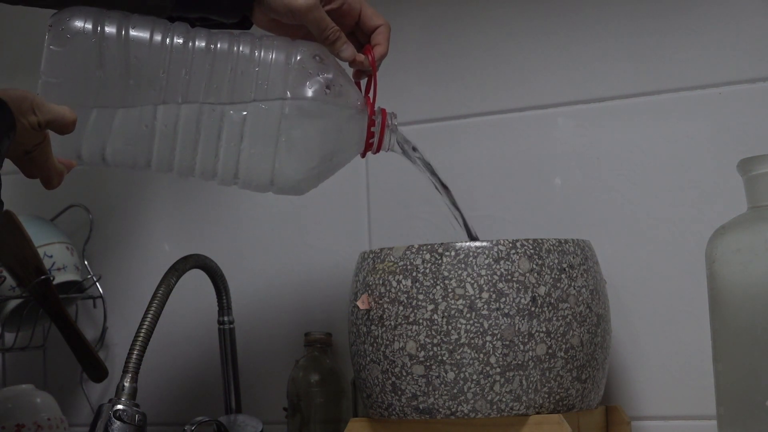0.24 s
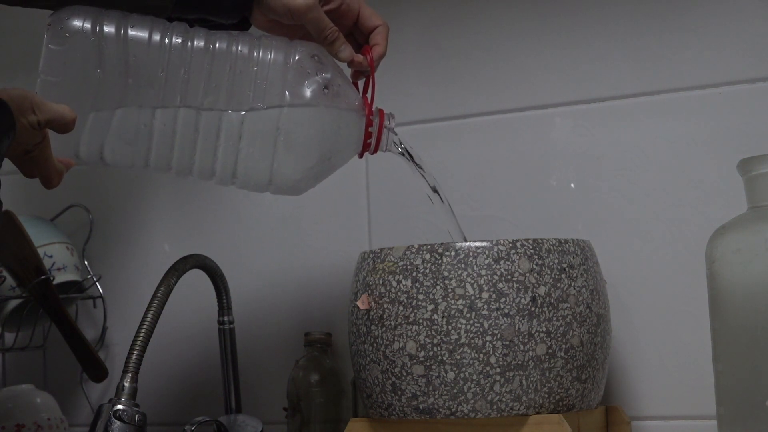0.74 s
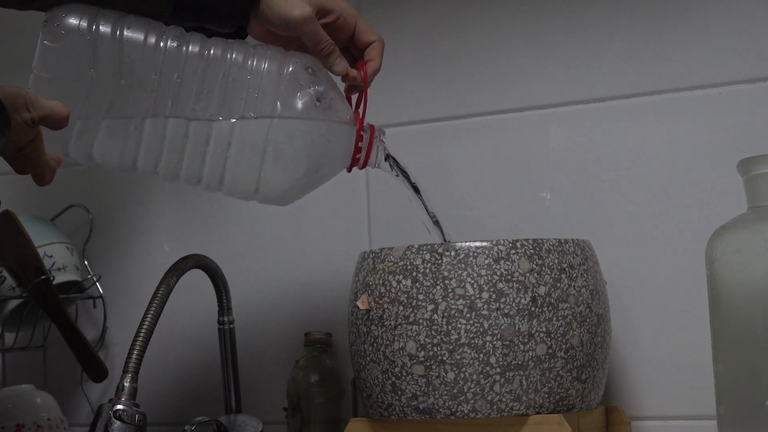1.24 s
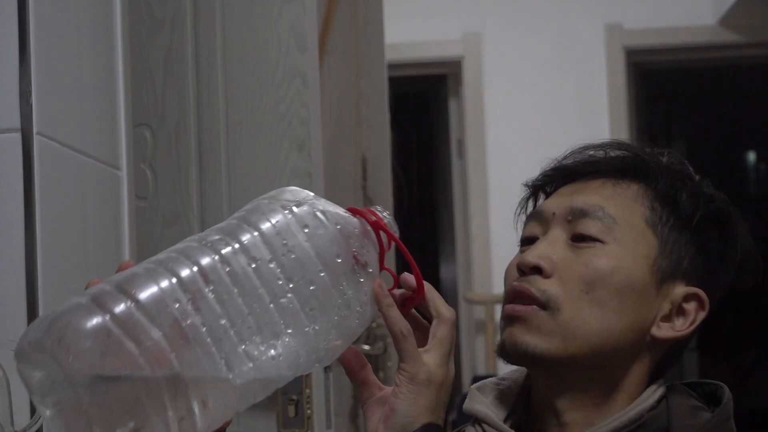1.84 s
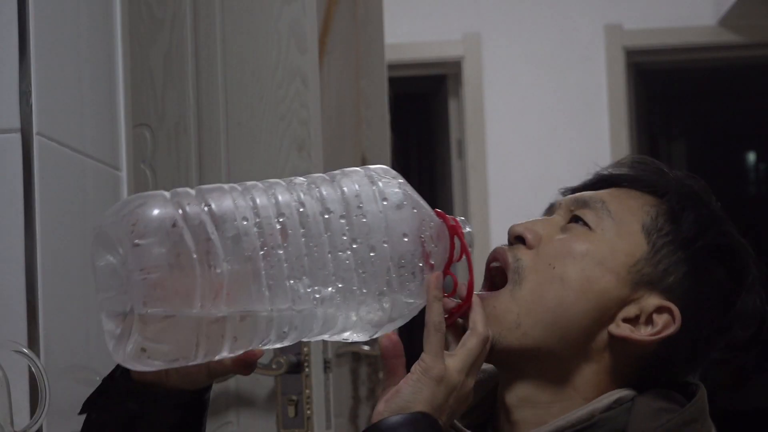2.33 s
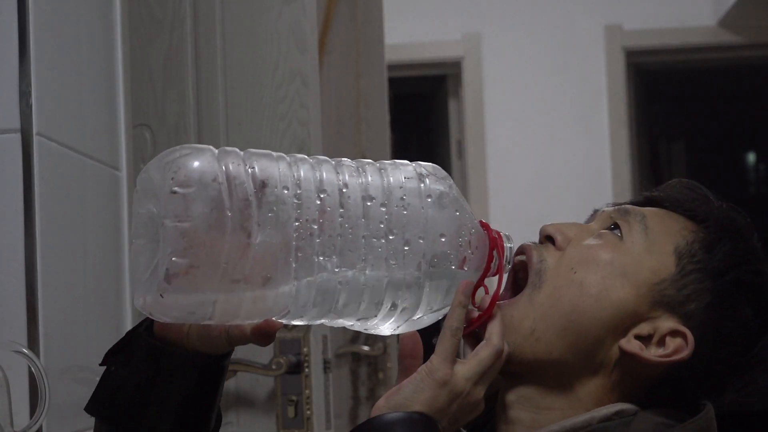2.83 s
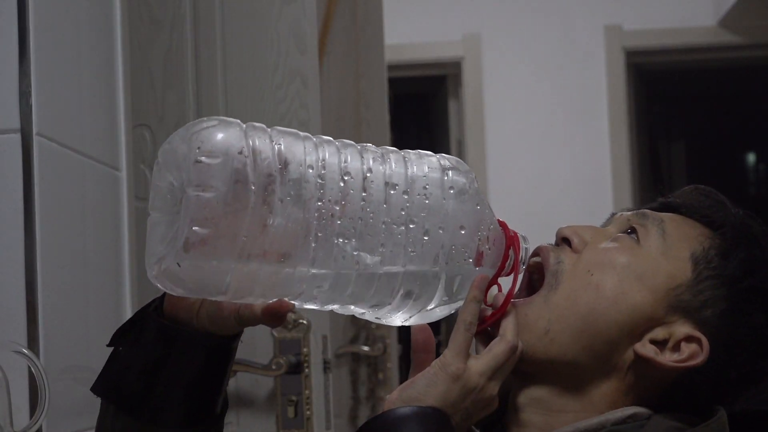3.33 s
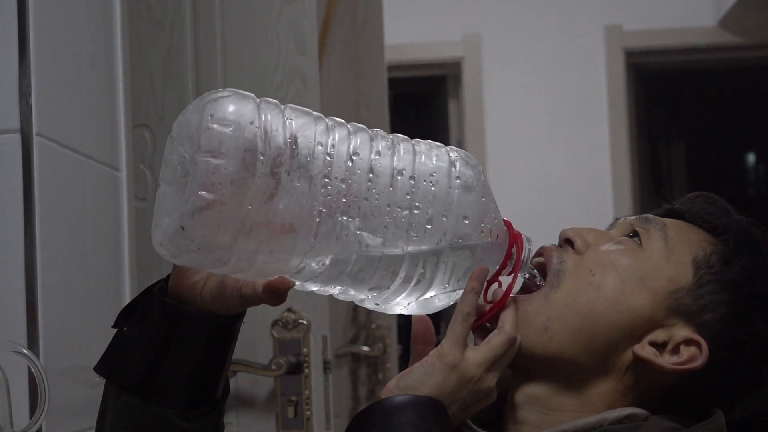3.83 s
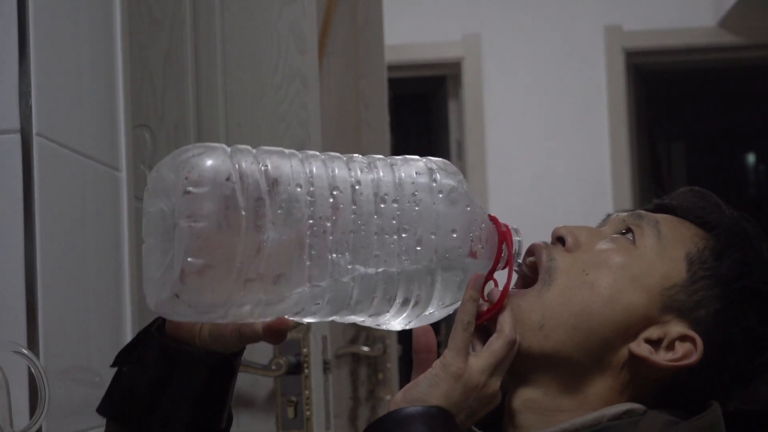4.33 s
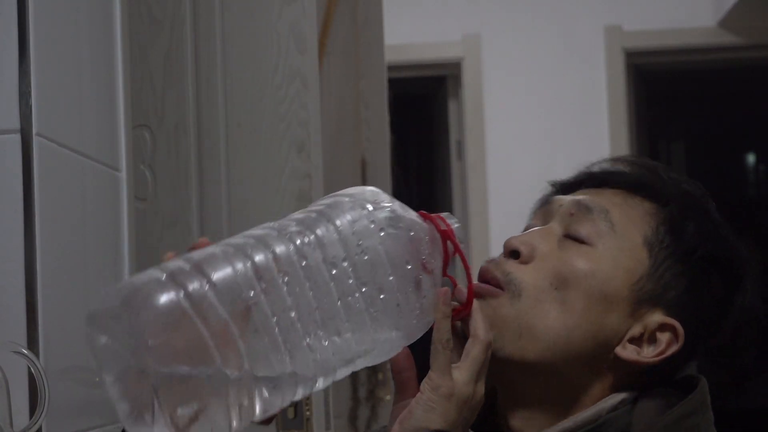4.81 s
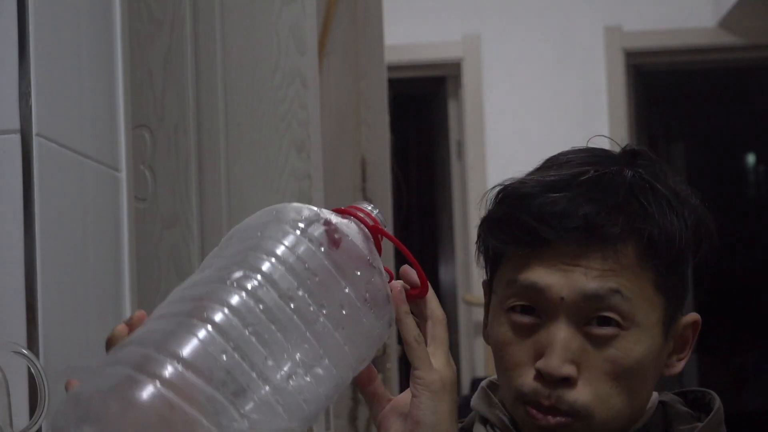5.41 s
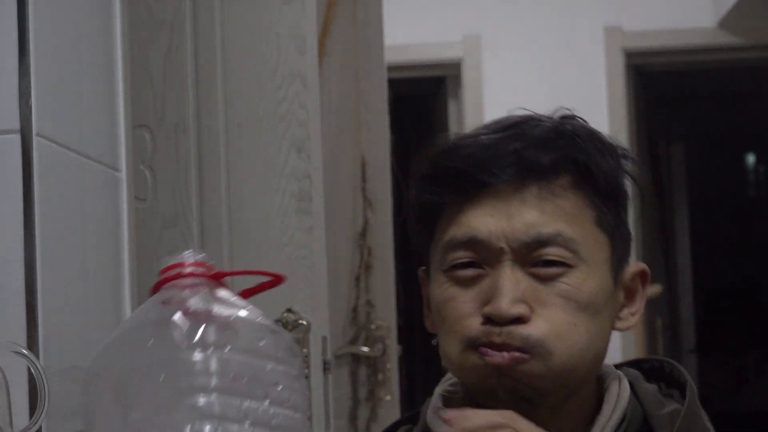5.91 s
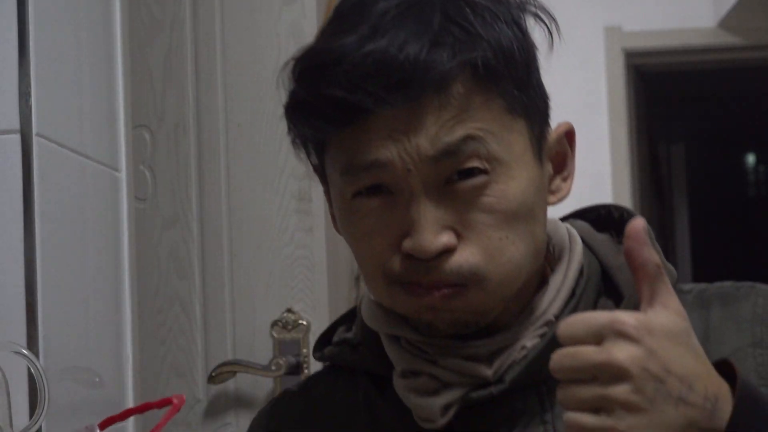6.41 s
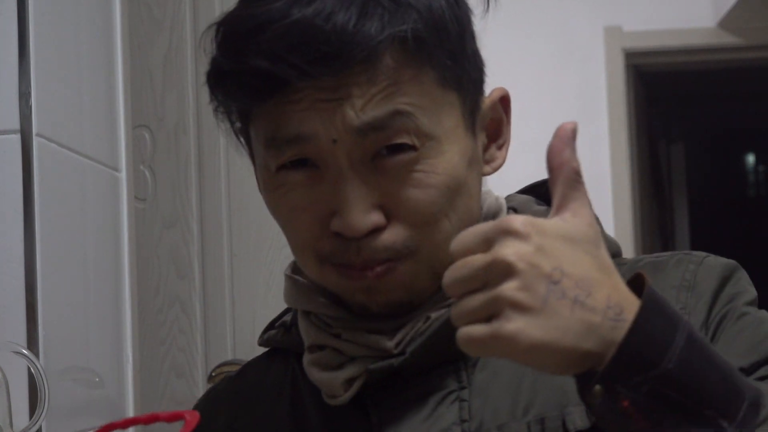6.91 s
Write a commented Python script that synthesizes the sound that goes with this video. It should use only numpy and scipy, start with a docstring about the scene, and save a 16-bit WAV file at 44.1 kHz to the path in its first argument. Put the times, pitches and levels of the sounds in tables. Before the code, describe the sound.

Water trickles from a big plastic jug into a stone crock with a deep gulp, a hollow knock, then plops, a sharp plastic crack and rustling cloth.

```python
"""Water runs from a big thin plastic jug into a stone crock in a tiled kitchen; the jug gulps, then knocks hollowly.
After an abrupt change of scene the jug is tipped up and the water plops inside it; it is lowered,
its dented wall pops back with a loud crack, and a jacket rustles.
Bubbles, gulps and the jug's ringing are fading sine tones; spray, splashes, ticks, thuds, cracks and cloth
are shaped noise. Echoes off the tiles and a faint microphone hiss over a low rumble go with them."""
import sys
import numpy as np
from scipy import signal
from scipy.fft import rfft, irfft
from scipy.io import wavfile
from scipy.ndimage import uniform_filter1d

SR = 44100
rng = np.random.default_rng(int(sys.argv[2]) if len(sys.argv) > 2 else 0)


def generate_wav(sig):
    """Save sig (samples, or channels by samples) to the path in sys.argv[1] as 16-bit PCM at SR."""
    pcm = np.round(np.clip(np.atleast_2d(sig).T, -1, 1) * 32767).astype(np.int16)
    wavfile.write(sys.argv[1], SR, pcm)


N = 315315
TIME = np.arange(N) / SR   # seconds
SCENE_CHANGE_S, KNOCK_S = 1.863, 1.677


def from_db(db):
    """Turn decibels into a factor to multiply a sound by."""
    return 10 ** (np.asarray(db) / 20)


def rms_one(x):
    """Scale a sound to an average strength (rms) of 1."""
    return x / np.sqrt(np.mean(x ** 2) + 1e-20)


def at_hz(points, hz):
    """Read a table between its rows, with pitch spaced evenly by octaves."""
    table_hz, values = np.array(points).T
    return np.interp(np.log(np.maximum(hz, 1)), np.log(table_hz), values)


def filtered(x, curve):
    """Strengthen or weaken each pitch of a sound by the decibels in a table."""
    hz = np.fft.rfftfreq(len(x), 1 / SR)
    return irfft(rfft(x) * from_db(at_hz(curve, hz)), len(x))


def coloured(x, spectrum):
    """Give a sound its balance of low and high pitches, at rms 1."""
    return rms_one(filtered(x, spectrum))


def add(out, s, sound):
    """Mix a sound in at time s, in seconds."""
    start = max(int(s * SR), 0)
    out[..., start:start + sound.shape[-1]] += sound[..., :max(N - start, 0)]


def stereo(mid, side, width):
    """Left and right share one sound (mid) and differ by another (side), set by the width table."""
    side = filtered(side, width)
    return np.array([mid + side, mid - side])


def kitchen_echoes(spectrum):
    """Dense reflections off the tiles are noise that fades at its own pace in each band of pitch."""
    # How fast the echoes fade. Each row: pitch in Hz, time to fall by 60 dB in seconds.
    room_t60 = [(100, 0.65), (400, 0.36), (1200, 0.44), (4000, 0.41), (8000, 0.35), (15000, 0.27)]
    # Stereo width set for the echoes. Each row: pitch in Hz, side level minus mid level in dB.
    echo_width = [(60, -31.5), (250, -20.5), (500, -15), (2500, -9.5), (5600, -35.5), (7300, -3),
                  (10500, -4.5), (13000, -22)]
    t, tail = TIME[:SR * 4 // 5], 0
    hz = np.fft.rfftfreq(len(t), 1 / SR)
    noise = rfft([coloured(white, spectrum) for white in rng.standard_normal((2, len(t)))])
    edges = [0, 150, 300, 600, 1200, 2400, 4800, 6500, 8500, 11000, 13500, 22051]   # Hz
    for low, high in zip(edges, edges[1:]):
        band = irfft(noise * ((hz >= low) & (hz < high)), len(t))
        tail = tail + band * from_db(-60 * t / at_hz(room_t60, (low + high) / 2))
    return stereo(*tail, echo_width)


def in_room(x, echoes, direct_db, wet_db):
    """The ear gets the direct sound plus its reflections."""
    reflections = signal.fftconvolve(x[None], echoes)[:, :N]
    return from_db(direct_db) * x + from_db(wet_db) * reflections


def burst(spectrum, decay_s):
    """A spray of noise that dies away; the longer it lasts, the softer it starts."""
    t = TIME[:SR // 2]
    noise = coloured(rng.standard_normal(len(t)), spectrum)
    return noise * np.exp(-t / decay_s) * (1 - np.exp(-t / (0.18 * decay_s)))


def hump(hz, octaves):
    """A balance of pitches with one broad peak."""
    edge = 2 ** (octaves / 2)
    return [(hz / edge / 8, -45), (hz / edge, -3), (hz, 0), (hz * edge, -4), (hz * edge * 8, -60)]


def bubble(hz, t60, rise, swell):
    """A trapped air pocket swells and rings, rising in pitch as it nears the surface."""
    # rise: part of the pitch gained in t60 seconds; swell: part of t60
    t = TIME[:int(t60 * SR) + 2]
    envelope = (1 - np.exp(-t / (swell * t60))) * from_db(-60 * t / t60)
    return np.sin(2 * np.pi * hz * t * (1 + rise * t / t60 / 2)) * envelope


def background():
    """A faint steady microphone hiss lies over a low rumble that slowly changes level."""
    # Balance of the hiss, then of the rumble. Each row: pitch in Hz, relative level in dB.
    hiss_spectrum, rumble_spectrum = [(100, -39.5), (170, -8.5), (218, -4), (306, -12), (399, -10),
                                      (520, -15), (561, -10.5), (973, -11), (1340, -14), (15800, -24)], [(11, -43), (18, -7.5), (43, -0.5), (102, 1.5),
                                                    (127, -5), (146, -22), (167, -28), (183, -32),
                                                    (190, -45), (250, -64.5), (420, -120)]
    # Width of the hiss, then of the rumble. Each row: pitch in Hz, side level minus mid level in dB.
    hiss_width, rumble_width = [(150, -10.5), (350, 5), (1400, 6), (4500, -1), (10000, -2.5), (13500, -17)], [(60, -24.5), (200, -18.5)]
    # Loudness of the rumble. Each row: time in seconds, level in dB.
    rumble_levels = [(0, -61), (1.8, -63), (2.3, -60.5), (2.8, -56.5), (4.9, -57), (5.6, -61.5), (6.3, -63),
                     (7.15, -67.5)]
    hiss_db = -62
    hiss = stereo(*[coloured(white, hiss_spectrum) for white in rng.standard_normal((2, N))], hiss_width)
    rumble = stereo(*[coloured(white, rumble_spectrum) for white in rng.standard_normal((2, N))], rumble_width)
    rumble_db = np.interp(TIME, *np.transpose(rumble_levels))
    return from_db(hiss_db) * hiss + from_db(rumble_db) * rumble


def flow():
    """The stream is a thinning trickle; each surge rises quickly, holds and ebbs as the jug rocks."""
    # Surges of water. Each row: start in seconds, level in dB, time until it ebbs in seconds.
    surges = [(0.0, -55.5, 0.083), (0.076, -51.5, 0.08), (0.176, -44, 0.07), (0.276, -46, 0.037),
              (0.37, -31, 0.019), (0.472, -43.5, 0.085), (0.622, -57.5, 0.083), (1.085, -56, 0.09),
              (1.277, -50.5, 0.044), (1.577, -53.5, 0.078)]
    trickle_db, thinning_db_per_s = -54.5, 2
    attack_s, release_s = 0.012, 0.022
    out = from_db(trickle_db - thinning_db_per_s * TIME)
    for s, db, hold_s in surges:
        attack = np.clip((TIME - s) / attack_s, 0, 1)
        release = np.exp(-np.maximum(TIME - s - hold_s, 0) / release_s)
        out = np.hypot(out, from_db(db) * attack * release)
    return out


def stream(per_s, cycles, spread_db, bubbles_db, drops_per_s, drop_spread_db, spray_db):
    """The stream drags in many small bubbles and throws up a fine crackling spray."""
    # Balance of the spray. Each row: pitch in Hz, relative level in dB.
    spray_spectrum = [(1760, -22.5), (3000, -4), (5570, -4.5), (6990, -15.5), (8820, -12), (11300, -18.5),
                      (15500, -16)]
    # Bubbles of the full stream, then of the thin one. Each row: pitch in Hz,
    # relative level in dB before the extra strength for high pitches below.
    full_stream, thin_stream = [(410, -41), (700, -11), (1030, -4.5), (1850, -10), (2180, -2),
                                (2940, -10.5), (3400, -7), (5550, -16), (7000, -14), (9100, -47),
                                (15400, -120)], [(410, -50), (700, -20), (771, -27.5), (1020, -5),
                                              (1590, -4.5), (2060, -8), (3370, -3), (7000, -31),
                                              (9100, -46), (15400, -120)]
    full_stream_end_s = 0.71
    spray_fade_db_per_s = 3.5   # a gentler stream throws up less spray

    sizes = from_db(drop_spread_db * np.minimum(rng.exponential(1, N), 4)) * rng.choice([-1, 1], N)
    drops = sizes * (rng.random(N) < drops_per_s / SR)
    spray = from_db(spray_db - spray_fade_db_per_s * TIME) * coloured(drops, spray_spectrum)

    froth, length = np.zeros(N), int(SCENE_CHANGE_S * SR)
    births = rng.random((3000, 3))
    for when, size, strength in births[:int(per_s * SCENE_CHANGE_S)]:
        s = when * SCENE_CHANGE_S
        hz = 800 * 8 ** size
        spectrum = full_stream if s < full_stream_end_s else thin_stream
        # small bubbles die sooner and cover a wider band
        gain = from_db(at_hz(spectrum, hz) + spread_db * strength ** 2) * hz
        add(froth, s, gain * bubble(hz, cycles / hz, rise=0.22, swell=0.1))
    # even out the froth, so that the flow alone sets how loud it is
    froth /= np.sqrt(uniform_filter1d(froth ** 2, size=SR // 8) + 0.01 * np.var(froth[:length]))
    return flow() * (from_db(bubbles_db) * froth + spray)


def small_sounds(first_scene):
    """Plops ring as single bubbles; splashes, ticks, thuds and flaps are short bursts, all from one scene."""
    # Dull thuds, clacks and creaks of the jug, some under its gulps.
    # Each row: start in seconds, level in dB, centre pitch in Hz.
    jug_thuds = [(0.061, -38, 38), (0.068, -32.5, 232), (0.376, -24, 320), (0.387, -37, 74.5),
                 (1.908, -37, 368), (2.031, -42, 406), (2.285, -52, 480), (2.368, -49.5, 990),
                 (2.454, -44.5, 390), (4.402, -30.5, 1310), (4.645, -48.5, 650), (5.519, -40.5, 680),
                 (5.612, -40.5, 700)]
    # Big single bubbles. Each row: start in seconds, starting pitch in Hz, level in dB,
    # time to fall by 60 dB in seconds.
    plops = [(0.072, 1510, -31, 0.052), (0.077, 1170, -37, .11), (0.178, 3270, -24, .032),
             (0.229, 994, -31.5, 0.076), (0.322, 2630, -29.5, .033), (0.35, 1400, -31.5, 0.055),
             (0.355, 964, -29.5, .08), (0.51, 2244, -31, 0.023), (0.632, 1037, -35, 0.15),
             (0.636, 1570, -40, .06), (0.753, 5120, -28, .02), (0.789, 1040, -42.5, 0.18),
             (1.009, 1476, -41.5, 0.11), (1.084, 1663, -38.5, .07), (1.149, 1670, -37.5, .04),
             (1.201, 1318, -38.5, 0.16), (1.275, 1250, -38, 0.089), (1.467, 1610, -34, .085),
             (1.566, 1484, -33, .07), (2.868, 5110, -31, 0.018), (3.865, 2990, -37.5, 0.023),
             (3.896, 4090, -39.5, .027), (3.93, 5100, -34, 0.018), (4.01, 1430, -38, .03),
             (4.062, 3850, -33.5, 0.034), (4.372, 1480, -32.5, 0.059), (4.403, 1067, -29, 0.11),
             (4.556, 1347, -39, .06)]
    # Slugs of water slap into the crock or slosh in the jug.
    # Each row: start in seconds, level in dB, centre pitch in Hz.
    splashes = [(0.205, -34.5, 810), (0.378, -23.5, 935), (0.622, -39.5, 730), (1.215, -46, 1400),
                (1.892, -41.5, 1135), (2.56, -57, 1400), (2.61, -57, 1400), (5.224, -38.5, 870),
                (5.457, -42.5, 495)]
    # Sharp ticks of drops on stone and on the thin plastic.
    # Each row: start in seconds, level in dB, centre pitch in Hz, decay in seconds.
    ticks = [(0.371, -24.5, 5000, 0.013), (0.757, -41.5, 4430, .015), (0.907, -43.5, 7300, 0.021),
             (1.025, -46, 8940, .01), (1.105, -47.5, 8440, .011), (1.109, -45, 2690, .04),
             (1.289, -43.5, 9800, .018), (1.465, -45, 5030, 0.026), (1.654, -33.5, 6570, 0.0067),
             (1.94, -41.5, 6900, 0.0087), (2.07, -52, 4630, 0.0065), (2.865, -44.5, 6100, 0.0052),
             (2.93, -49, 2100, 0.0078), (3.866, -48.5, 4400, .02), (4.009, -43.5, 1650, 0.008),
             (4.025, -47.5, 6000, 0.0083), (4.055, -39.5, 3260, .012), (4.4005, -34, 4020, .003),
             (5.221, -40, 3570, .004), (5.318, -42, 3740, 0.0037)]
    # Folds of the jacket flap over. Each row: start in seconds, level in dB, centre pitch in Hz.
    flaps = [(6.108, -37.5, 1250), (6.433, -33, 850), (6.884, -39, 1600)]

    def here(rows):
        """Pick the rows that fall in this scene."""
        return [row for row in rows if (row[0] < SCENE_CHANGE_S) == first_scene]

    out = np.zeros(N)
    for s, db, hz in here(jug_thuds):
        decay_s = 0.0062 * (1000 / hz) ** 0.37   # lower thuds last longer
        add(out, s, from_db(db) * burst(hump(hz, octaves=0.54), decay_s))
    for s, hz, db, t60 in here(plops):
        add(out, s, from_db(db) * bubble(hz, t60, rise=0.22, swell=0.064))
    for s, db, hz in here(splashes):
        add(out, s, from_db(db) * burst(hump(hz, octaves=1.52), decay_s=0.018))
    for s, db, hz, decay_s in here(ticks):
        add(out, s, from_db(db) * burst(hump(hz, octaves=0.3), decay_s))
    for s, db, hz in here(flaps):
        add(out, s, from_db(db) * burst(hump(hz, octaves=2.64), decay_s=0.014))
    return out


def gulps(sag):
    """A big pocket of air swells into a low note that sags onto its pitch."""
    # The jug's air gulps. Each row: start in seconds, final pitch in Hz, level in dB,
    # swell in seconds, decay in seconds.
    air_gulps = [(0.066, 190, -35, 0.0054, 0.024), (0.372, 217.6, -3, 0.024, 0.023),
                 (0.423, 222, -13, 0.005, 0.009), (5.548, 441, -21, 0.011, 0.0071)]
    out, t = np.zeros(N), TIME[:SR // 2]
    for s, hz, db, swell_s, decay_s in air_gulps:
        pitch = hz * (1 + sag * np.exp(-t / swell_s))
        phase = 2 * np.pi * np.cumsum(pitch) / SR
        envelope = (1 - np.exp(-(t / swell_s) ** 2)) * np.exp(-t / decay_s)
        add(out, s, from_db(db) * envelope * np.sin(phase))
    return out


def jacket(echoes, grain_db):
    """Cloth slides over cloth in countless tiny catches, swelling and fading with each move of the arms."""
    # Balance of the rubbing cloth. Each row: pitch in Hz, relative level in dB.
    cloth = [(88, -26.5), (150, -9.5), (199, -12.5), (366, -1.5), (451, -3), (525, -7.5), (928, -5),
             (2180, -10.5), (4570, -10), (7200, -19), (9220, -22.5), (10900, -25.5), (14000, -31.5)]
    # The sleeves rub while the arms lift the jug, lower it and rise again.
    # Each row: fastest moment in seconds, level in dB, half length in seconds.
    arm_moves = [(2.206, -60.5, 0.53), (5.1, -59.5, 0.93), (6.425, -49, 0.39), (6.936, -56.5, 0.11)]
    catches = np.interp(TIME, np.linspace(0, N / SR, 1500), rng.standard_normal(1500))
    rub = coloured(rng.standard_normal(N) * from_db(grain_db * catches), cloth)
    speed = sum(from_db(db) * np.exp(-((TIME - s) / half_s) ** 2) for s, db, half_s in arm_moves)
    return in_room(rub * speed, echoes, direct_db=-3.0, wet_db=-4.5)


def jug_ring(attack_s):
    """The knock sets the jug's walls and air ringing, each at its own pitch."""
    # Ringing notes of the jug. Each row: pitch in Hz, relative level in dB, time to fall by 60 dB in seconds.
    jug_modes = [(293, -2.5, 0.29), (357.4, 11, 0.29), (430, 6, 0.3), (539.5, 5.5, 0.39), (685, 6, 0.26),
                 (970, 12, 0.14), (1070, -7.5, 0.6), (1128, 6.5, 0.37), (1599, -16, 0.21), (1728, -7, 0.33),
                 (1884, -3.5, 0.31), (1976, -7, 0.16), (2296, -10, 0.41)]
    ring_db = -23.5
    out, t = np.zeros(N), TIME[:SR // 2]
    for hz, db, t60 in jug_modes:
        mode = np.sin(2 * np.pi * (hz * t + rng.random())) * from_db(db - 60 * t / t60)
        add(out, KNOCK_S, from_db(ring_db) * mode * (1 - np.exp(-t / attack_s)))
    return out


def blow(spectrum, decay_s, direct_db):
    """A hard blow is a short burst while the room fills up with its colour."""
    out = kitchen_echoes(spectrum)
    out *= 1 - np.exp(-TIME[:out.shape[1]] / decay_s)
    add(out, 0, from_db(direct_db) * burst(spectrum, decay_s))
    return out


def knocking(echoes):
    """The water-laden jug knocks: a thud plus the hollow ringing of the jug."""
    # Balance of the thud. Each row: pitch in Hz, relative level in dB.
    thud = [(53, -63), (90, -35), (327, -9.5), (429, 3.5), (481, -8), (540, -6.5), (735, -10.5), (1100, -8),
            (1190, -10.5), (1780, -17), (9000, -68.5), (11700, -98), (19800, -120)]
    thud_db, low_cut_hz = -13.5, 105
    knock = in_room(jug_ring(attack_s=0.005), echoes, direct_db=-3, wet_db=-25)
    add(knock, KNOCK_S, from_db(thud_db) * blow(thud, decay_s=0.0045, direct_db=4.0))
    # the knock carries little bass
    return signal.sosfilt(signal.butter(2, low_cut_hz, "high", fs=SR, output="sos"), knock)


def pouring(echoes):
    """First scene: the stream strikes the crock with its splashes, then the jug knocks."""
    water = stream(per_s=450, cycles=60, spread_db=10, bubbles_db=-1.5,
                   drops_per_s=2000, drop_spread_db=2.5, spray_db=1.5)
    water = water + small_sounds(True)
    return in_room(water, echoes, direct_db=-2, wet_db=-2.5) + knocking(echoes)


def handling(echoes):
    """Second scene: water plops in the tipped jug, then the dented wall snaps back rib by rib."""
    # Snaps of the wall. Each row: start in seconds, level in dB, decay in seconds.
    buckles = [(5.6805, -14, 0.00059), (5.692, -17.5, 0.0031), (5.714, -21, 0.006), (5.733, -18, 0.0041)]
    # Balance of each snap. Each row: pitch in Hz, relative level in dB.
    crack = [(40, -47.5), (85, -20.5), (230, -19), (390, -0.5), (520, -7), (1100, -4), (2300, -5),
             (3900, 0.5), (5200, 0), (7400, -14), (9200, -15.5), (10800, -23.5), (14500, -25), (16000, -45)]
    out = in_room(small_sounds(False), echoes, direct_db=-2.5, wet_db=-0.5)
    for s, db, decay_s in buckles:
        add(out, s, from_db(db) * blow(crack, decay_s, direct_db=5))
    return out


def scene():
    """The pouring and its echo stop dead at the change of scene."""
    echoes = kitchen_echoes([(20, 0), (20000, 0)])
    echoes /= np.sqrt(np.sum(echoes ** 2) / 2)
    cut = np.clip((SCENE_CHANGE_S - TIME) / 0.0039, 0, 1)
    first = cut * pouring(echoes) * from_db([[-0.5], [0.5]])   # slightly louder on the right
    air = in_room(gulps(sag=0.08), echoes, direct_db=0, wet_db=-17)
    return first + air + handling(echoes) + jacket(echoes, grain_db=2) + background()


def record(dry):
    """The highest peaks are rounded and the pitches above the cutoff are removed."""
    cutoff_hz = 15800
    rounded = 0.93 * np.tanh(dry / 0.88)
    return signal.sosfilt(signal.ellip(10, 0.2, 80, cutoff_hz, fs=SR, output="sos"), rounded)


dry = scene()
out = record(dry)
generate_wav(out)
```